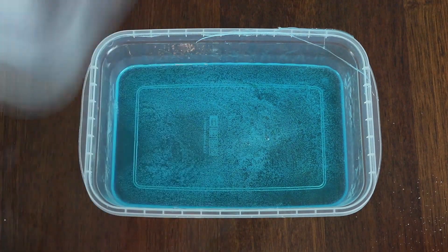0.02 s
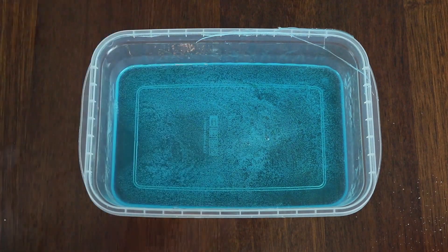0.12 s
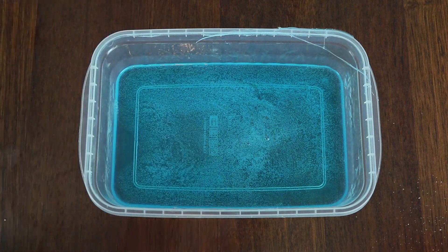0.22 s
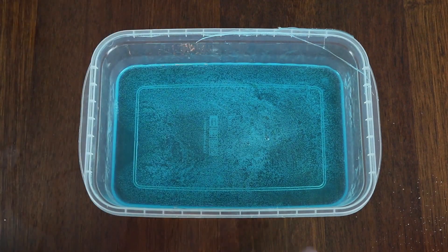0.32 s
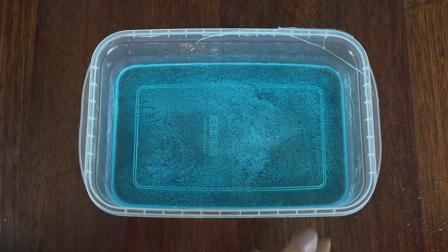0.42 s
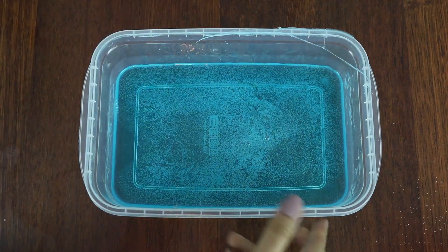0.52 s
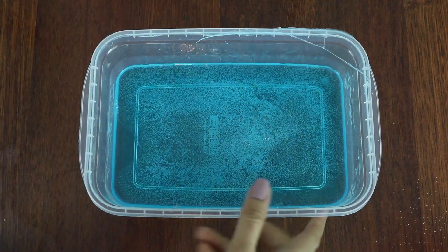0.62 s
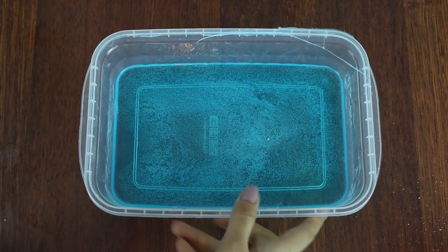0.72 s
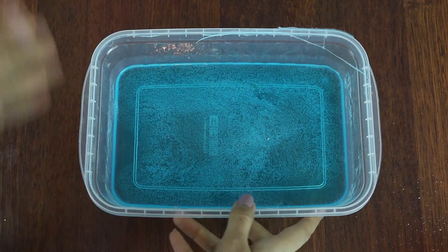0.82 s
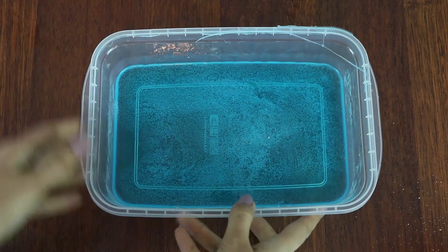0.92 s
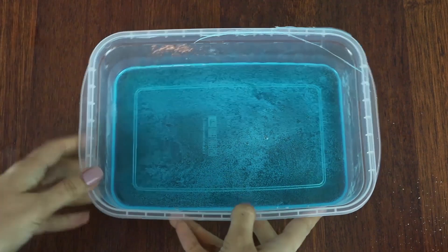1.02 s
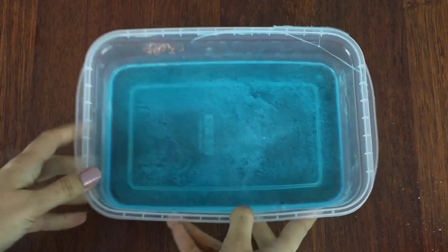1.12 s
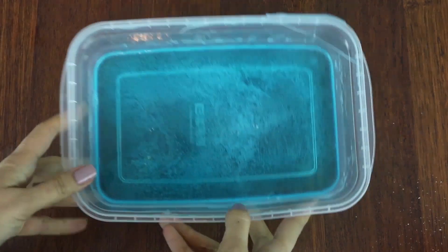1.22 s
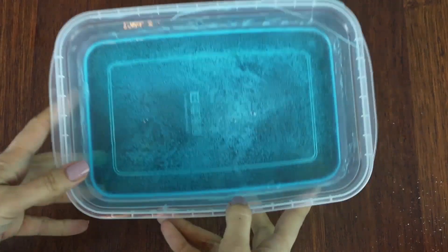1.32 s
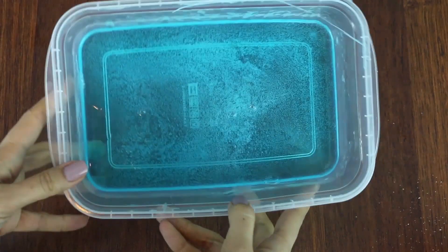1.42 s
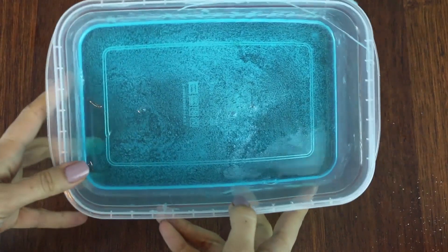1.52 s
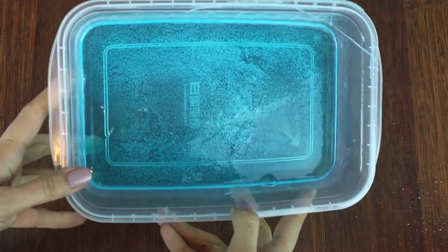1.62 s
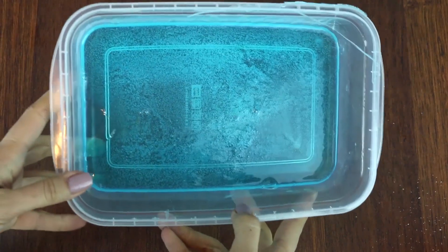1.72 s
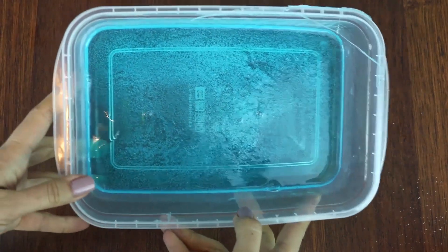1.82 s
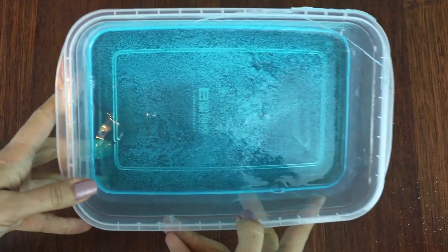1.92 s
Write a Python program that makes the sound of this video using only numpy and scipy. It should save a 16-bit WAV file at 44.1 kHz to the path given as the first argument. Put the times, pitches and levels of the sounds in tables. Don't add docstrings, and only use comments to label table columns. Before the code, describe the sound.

Close up in a bare room, a plastic lid clatters onto wood in sharp hard knocks ending with an overloaded slap, its tail ringing briefly, then quiet thumps, ticks and rubbing as hands take hold of a tub.

```python
import sys
import numpy as np
from scipy import signal
from scipy.fft import rfft, irfft, next_fast_len
from scipy.io import wavfile
from scipy.ndimage import map_coordinates

SR = 44100
rng = np.random.default_rng(int(sys.argv[2]) if len(sys.argv) > 2 else 0)


def gain_from_db(level_db):
    decades = np.asarray(level_db, float) / 20
    return 10 ** decades


def inscribe(sig):
    pcm = np.round(np.clip(np.atleast_2d(sig).T, -1, 1) * 32767)
    wavfile.write(sys.argv[1], SR, pcm.astype(np.int16))


N = 88200


def unit(x):
    return x / np.sqrt(np.mean(x ** 2) + 1e-20)


def peaked(x):
    return x / np.abs(x).max()


def along(points, hz):
    f, v = np.transpose(points)
    return np.interp(np.log(hz + 1), np.log(f + 1), v)


def filtered(x, response):
    m = next_fast_len(len(x) + 8192)
    spectrum = rfft(x, m) * response(np.fft.rfftfreq(m, 1 / SR))
    return irfft(spectrum, m)[:len(x)]


def bright(x, hz):
    return filtered(x, lambda f: (1j * f / (hz + 1j * f)) ** 2)


def body(peaks):
    def response(f):
        total = 0
        for k, (hz, width, db) in enumerate(peaks):
            total = total + (-1) ** k * gain_from_db(db) * 1j * f * width / (hz * hz - f * f + 1j * f * width)
        return total
    return response


def burst(t60):
    t = np.arange(SR // 4) / SR
    firm = 3.5
    return np.r_[firm, rng.standard_normal(len(t) - 1)] * gain_from_db(-60 * t / t60)


def ring(t, db, hz, t60):
    return gain_from_db(db - 60 * t / t60) * np.sin(2 * np.pi * hz * t)


def add(out, s, x):
    part = out[round(s * SR):][:len(x)]
    part += x[:len(part)]


def lid():
    contact_times = [
        .2332,
        .2372,
        .4962,
        .4990,
        .6913,
        .6937,
        .7135,
        .716,
    ]
    # (peak [dB], contact t60 [s], crack [dB], room tail rms at its start [dB])
    contacts = [(12.5, 0.017, -1.5, -13), (0, 0.052, -21, -29.5), (7.5, 0.018, 11, -15),
                (-6, 0.083, -3, -31), (8, 0.0013, -20.5, -29), (-1, 0.047, -27, -41.5),
                (0, 0.0048, -29.5, -35.5), (15, 0.043, -23.5, -2)]
    # (frequency [Hz], width [Hz], level [dB])
    edge = [(275, 58, -4), (400, 140, -3.5), (735, 120, -3), (1000, 67, -9), (1410, 190, -8.5),
            (1950, 970, -6.5), (3300, 1000, -12), (4720, 1300, -10.5)]
    corner = [(150, 70, -22), (646, 220, -13.5), (1620, 87, -2.5), (3270, 390, -4), (4560, 850, -6.5),
              (6700, 1400, -7.5)]
    rim = [(350.7, 230, -13.5), (950, 460, 0.5), (1850, 420, 0), (2750, 500, -7.5), (3940, 1100, -13)]
    flat = [(182, 27, -20), (750, 670, -14), (1736, 90, -8), (2042, 390, -6.5), (3340, 260, -19),
            (4560, 600, -16), (6500, 3000, -29)]
    # (frequency [Hz], level per Hz [dB])
    edge_tail = [(110, -34), (150, -6.5), (370, -2.5), (480, -13), (600, -1), (1900, -10), (6000, -16.5),
                 (15500, -36)]
    corner_tail = [(110, -25), (200, -12), (540, -9.5), (790, -0.5), (1900, -9.5), (6000, -17),
                   (9000, -23.5), (15500, -37)]
    flat_tail = [(110, -32), (240, -18), (950, -10.5), (1800, -9), (2500, -11), (6000, -17.5),
                 (9000, -26.5), (15500, -46)]
    # (frequency [Hz], width [Hz], level [dB])
    hollows = [(1874, 220, 0.5), (3300, 130, -4), (4760, 350, 1), (6200, 500, -9.5)]
    # (time [s], peak [dB], pitch [Hz], t60 [s])
    lid_rings = [(.4964, 10, 1620, .012), (.4988, -7, 740, .04), (.4988, -9, 955, .03),
                 (.4992, -7, 560, .04), (.5005, -11, 1890, .05), (.4990, -14, 5050, .06),
                 (.499, -16, 3405, .07), (.499, -15, 210, .05), (.4965, -14, 7800, .02),
                 (.716, 15, 2100, .035), (.7195, 5, 1945, .12), (.7225, 9, 1737, .09),
                 (.7495, 2, 2170, .05), (.2362, -3, 268, .07), (.2372, -8, 355, .07),
                 (.785, -6, 1740, .3), (.83, -8, 1880, .15), (.722, -6, 4740, .15),
                 (.237, -10, 560, .04), (.2372, -9, 740, .06), (.241, -14, 5120, .07),
                 (.235, -13, 1520, .05), (.238, -13, 1810, .07)]
    crack_t60, crack_hz, crack_top_hz = 0.0046, 2500, 9000

    def favoured(f):
        return 1 + sum(gain_from_db(db) * np.exp(-((f - hz) / width) ** 2) for hz, width, db in hollows)

    parts = [(edge, edge_tail)] * 2 + [(corner, corner_tail)] * 2
    parts += [(rim, corner_tail)] * 3 + [(flat, flat_tail)]
    out = np.zeros(N)
    for s, (db, t60, crack_db, wet_db), (modes, far) in zip(contact_times, contacts, parts):
        knock = peaked(filtered(burst(t60), body(modes)))
        crack = bright(burst(crack_t60), crack_hz)
        crack = peaked(filtered(crack, lambda f: 1 / (1 + 1j * f / crack_top_hz) ** 2))
        add(out, s, gain_from_db(db) * (knock + gain_from_db(crack_db) * crack))
        tail = room(lambda f: gain_from_db(along(far, f)) * favoured(f) * (f > 90))
        add(out, s, gain_from_db(wet_db) * tail)
    t = np.arange(SR // 8) / SR
    for s, db, hz, t60 in lid_rings:
        add(out, s, ring(t, db, hz, t60))
    return bright(out, 40)


def table():
    # (frequency [Hz], t60 [s])
    top_modes = [(35, 0.25), (72, 0.94), (146, 0.2)]
    # (time [s], peak of first, second and third mode [dB])
    shakes = [
        (0.236, -47, -35.5, -14.5),
        (0.497, -54, -43, -57),
        (.692, -43, -35, -47),
        (0.716, -35, -32, -43),
        (0.829, -50, -43, -63),
        (0.896, -21.5, -38, -29),
        (1.072, -19, -31.5, -18),
        (1.218, -28, -38.5, -70),
    ]
    rise_s, hand_damping = 0.019, 0.34
    t = np.arange(SR // 2) / SR
    swell = 1 - np.exp(-t / rise_s)
    out = np.zeros(N)
    for s, *levels in shakes:
        damp = hand_damping if s > .7 else 1
        for (hz, t60), db in zip(top_modes, levels):
            add(out, s, ring(t, db, hz, damp * t60) * swell)
    return out


def knuckles():
    # (time [s], peak [dB], pitch [Hz], t60 [s])
    tub_knocks = [(1.205, -33, 950, 0.048), (1.203, -31, 680, 0.035), (1.23, -27, 650, .04),
                  (1.246, -33, 854, .04), (1.267, -36, 265, 0.1), (1.294, -29, 800, 0.042),
                  (1.31, -42, 925, 0.093), (1.331, -45, 700, .04), (1.334, -35, 950, 0.054),
                  (1.356, -34, 720, .05), (1.364, -32, 375, .07), (1.372, -32, 385, .1),
                  (1.391, -36, 375, .06), (1.719, -39.5, 372, .08), (1.712, -46, 237, .2),
                  (1.385, -39, 1000, .04), (1.618, -39.5, 1000, 0.056), (1.711, -43, 990, 0.071),
                  (1.749, -55, 385, 0.04)]
    rise_s = .004
    t = np.arange(SR // 2) / SR
    out = np.zeros(N)
    for s, db, hz, t60 in tub_knocks:
        add(out, s, ring(t, db, hz, t60) * (1 - np.exp(-t / rise_s)))
    return out


def nails():
    # (time [s], low ring peak [dB], high ring peak [dB])
    taps = [
        (0.721, -20, -20),
        (.97, -36, -50),
        (1.068, -36, -59),
        (1.166, -39, -60),
        (1.286, -44, -52),
        (1.354, -43, -66),
        (1.375, -40, -45),
        (1.618, -48, -71),
        (1.7105, -47, -69.5),
    ]
    # (frequency [Hz], level [dB], t60 [s])
    low_modes = [(1743, -8, .6), (1790, -11, .25), (1830, 3, 0.06)]
    high_modes = [(4600, -3.5, 0.25), (4760, -6.5, 0.24), (5110, -5.5, .4), (5300, -6.5, 0.28),
                  (3130, -1.5, 0.14)]
    waver_rad, waver_hz, flutter_size_db, flutter_hz = .7, 110, 2.5, 60
    t = np.arange(SR // 2) / SR
    onset = np.minimum(t * 50, 1)
    out = np.zeros(N)
    for s, *levels in taps:
        for db, modes in zip(levels, (low_modes, high_modes)):
            for hz, level, t60 in modes:
                knots = rng.standard_normal(60)
                wander = waver_rad * (hz / 1750) ** 1.5 * map_coordinates(knots, [t * waver_hz])
                flutter = flutter_size_db * map_coordinates(knots[::-1], [t * flutter_hz]) * onset
                level_db = db + level + flutter - 60 * t / t60
                add(out, s, gain_from_db(level_db) * np.sin(2 * np.pi * hz * t + wander))
    return out


def bumps():
    # (time [s], peak [dB], pitch [Hz], t60 [s])
    soft_bumps = [(0.124, -39, 1070, .02), (1.052, -24, 704, 0.033), (1.054, -24, 435, 0.083),
                  (1.055, -25.5, 249, 0.21), (1.058, -37.5, 150, 0.46), (1.163, -32.5, 355, 0.36),
                  (1.203, -51, 750, 0.046), (1.2, -35, 290, 0.11), (1.245, -34.5, 800, 0.085),
                  (1.296, -56, 850, .03), (1.334, -38.5, 750, 0.037), (1.36, -51, 700, 0.037),
                  (1.371, -36, 380, 0.14), (1.376, -46, 240, 0.1), (1.622, -51, 970, 0.05),
                  (1.712, -49, 1380, 0.02), (1.719, -59, 380, 0.05), (1.711, -55, 235, 0.18)]
    spread, wet_db = .3, -21
    out = np.zeros(N)
    for s, db, hz, t60 in soft_bumps:
        dull = body([(hz, spread * hz, 0)])
        add(out, s, gain_from_db(db) * peaked(filtered(burst(t60), lambda f: dull(f) ** 2)))
        add(out, s, gain_from_db(db + wet_db) * room(lambda f: dull(f) ** 2))
    return out


def ticks():
    # (time [s], peak [dB], pitch [Hz], t60 [s])
    skin_ticks = [(.998, -36, 13500, .03), (1.044, -37, 12500, .005), (1.056, -39, 11000, .005),
                  (1.073, -42, 11500, .012), (1.112, -32, 9000, .004), (1.171, -35, 10500, .004),
                  (1.358, -45, 9000, .006), (1.375, -40, 5500, .012), (1.372, -46, 12000, .006)]
    spread = .8
    out = np.zeros(N)
    for s, db, hz, t60 in skin_ticks:
        band = body([(hz, spread * hz, 0)])
        add(out, s, gain_from_db(db) * peaked(filtered(burst(t60), lambda f: band(f) ** 2)))
    return out


def rubbing():
    # (time [s], level [dB])
    rub_level = [(0, -39), (.1, -45), (.19, -45), (.22, -43), (.9, -32.5), (1.1, -35.5), (1.25, -43.5),
                 (1.35, -47), (1.4, -48.5), (1.48, -55.5), (1.75, -59), (2, -59)]
    # (frequency [Hz], level per Hz [dB])
    skin_colour = [(60, -30.5), (100, -16.5), (156, -13), (280, -6.5), (660, -7), (1790, -7), (4960, -16),
                   (15500, -39.5)]
    # (time [s], level [dB], pitch [Hz], width [Hz], half length [s])
    scuffs = [
        (0.205, -48.5, 5000, 610, 0.012),
        (1.237, -49.5, 5470, 1200, 0.04),
        (1.24, -57.5, 9700, 7000, 0.04),
    ]
    rough_db, rough_hz = 1.5, 68
    t = np.arange(N) / SR
    rough = map_coordinates(rng.standard_normal(400), [t * rough_hz])
    skin = filtered(rng.standard_normal(N), lambda f: gain_from_db(along(skin_colour, f)) * (f > 50))
    out = gain_from_db(np.interp(t, *np.transpose(rub_level))) * unit(skin * gain_from_db(rough_db * rough))
    for s, db, hz, width, half in scuffs:
        band = body([(hz, width, 0)])
        scrape = unit(filtered(rng.standard_normal(N), lambda f: band(f) ** 2))
        out += gain_from_db(db) * np.exp(-((t - s) / half) ** 2) * scrape
    return out


def shuffle():
    # (time [s], level [dB])
    shuffle_level = [(1.1, -55), (1.16, -45), (1.21, -40.5), (1.27, -49), (1.33, -49), (1.37, -60.5),
                     (1.42, -70)]
    pitch_hz, width_hz, rough_db, rough_hz = 700, 700, 5, 70
    t = np.arange(N) / SR
    rough = map_coordinates(rng.standard_normal(400), [t * rough_hz])
    band = body([(pitch_hz, width_hz, 0)])
    friction = filtered(rng.standard_normal(N), lambda f: band(f) ** 2) * gain_from_db(rough_db * rough)
    level_db = np.interp(t, *np.transpose(shuffle_level), left=-120, right=-120)
    return gain_from_db(level_db) * unit(friction)


def room(colour):
    # (frequency [Hz], t60 [s])
    room_t60 = [(100, 1), (300, 0.38), (700, 0.45), (1800, 0.71), (4800, 0.6), (9000, 0.47), (14000, 0.36)]
    wall_delay_s = .006
    hz, t, z = signal.stft(rng.standard_normal(SR), SR, nperseg=128)
    dying = z * gain_from_db(-60 * t / along(room_t60, hz)[:, None])
    tail = filtered(signal.istft(dying, SR, nperseg=128)[1], colour)
    return np.pad(tail / tail[:2000].std(), (round(wall_delay_s * SR), 0))


def air():
    # (frequency [Hz], level per Hz [dB])
    hiss_colour = [(15, -56), (25, -5.5), (233, -4), (421, -17.5), (469, -10), (762, -13), (1270, -15.5),
                   (1570, -24), (15500, -23)]
    # (frequency [Hz], width [Hz], level [dB])
    drones = [(240, 13, -2.4), (380, 40, -6), (490, 23, -8.5)]
    hiss_db, drone_db = -56, -57.5
    hiss = unit(filtered(rng.standard_normal(N), lambda f: gain_from_db(along(hiss_colour, f))))
    drone = unit(filtered(rng.standard_normal(N), lambda f: body(drones)(f) ** 2))
    return gain_from_db(hiss_db) * hiss + gain_from_db(drone_db) * drone


def scene():
    hands = knuckles() + nails() + bumps() + ticks() + rubbing() + shuffle()
    return (lid() + table() + hands + air())[None]


def top_cut(x):
    return signal.sosfilt(signal.butter(12, 16060, fs=SR, output="sos"), x)


def record(dry):
    top_hz, clip, knee = 15800, 1.0, 12
    low_pass = signal.ellip(10, .3, 70, top_hz, fs=SR, output="sos")
    x = signal.sosfilt(low_pass, dry)
    mix = x / (1 + np.abs(x / clip) ** knee) ** (1 / knee)
    return top_cut(mix)


dry = scene()
out = record(dry)
inscribe(out)
```